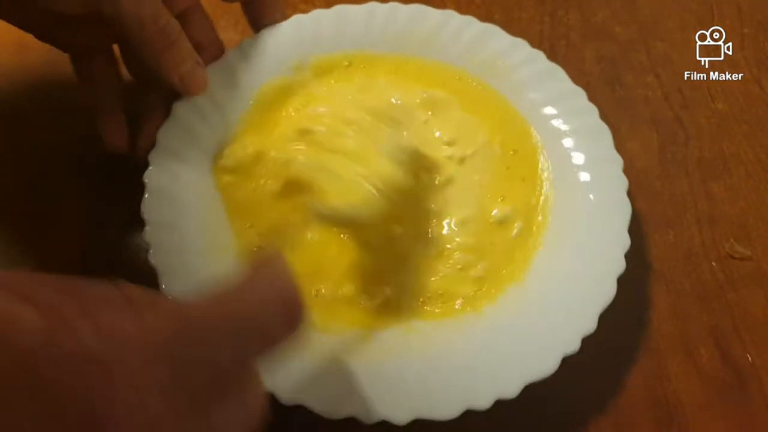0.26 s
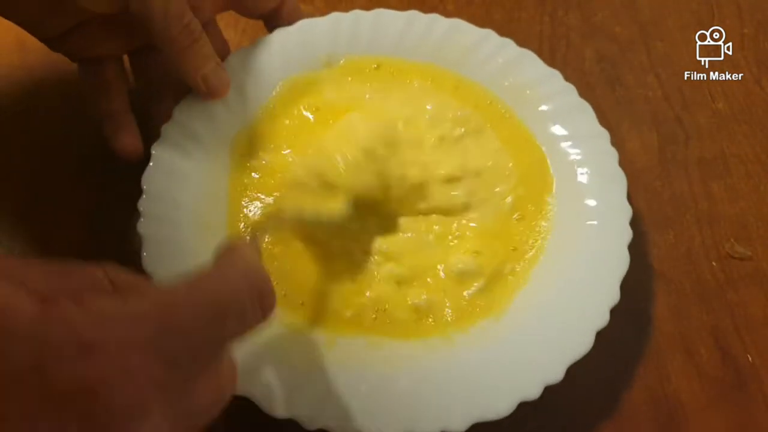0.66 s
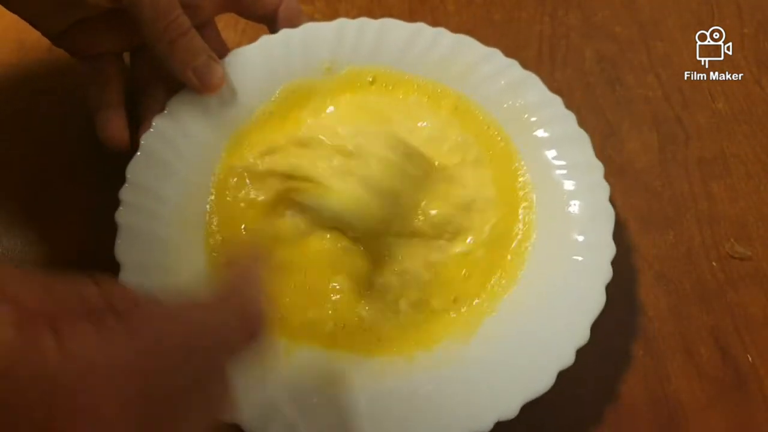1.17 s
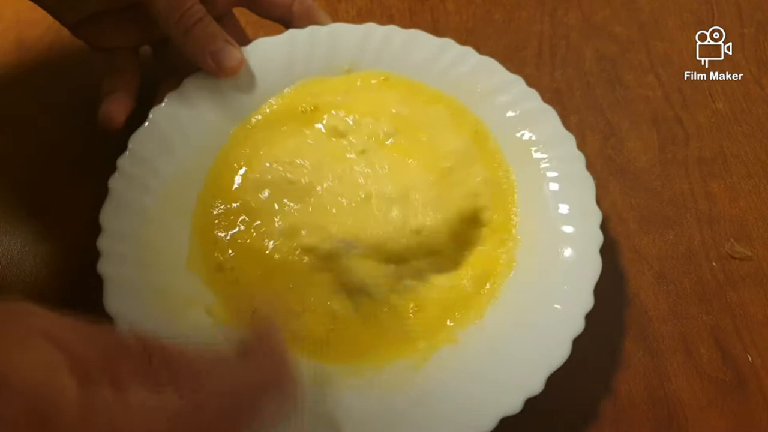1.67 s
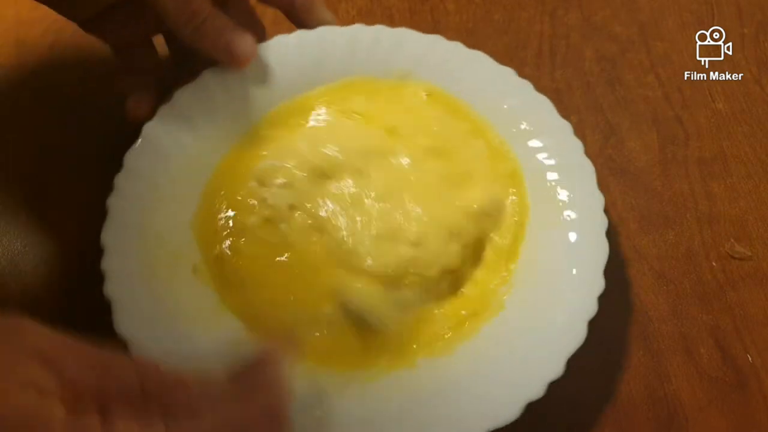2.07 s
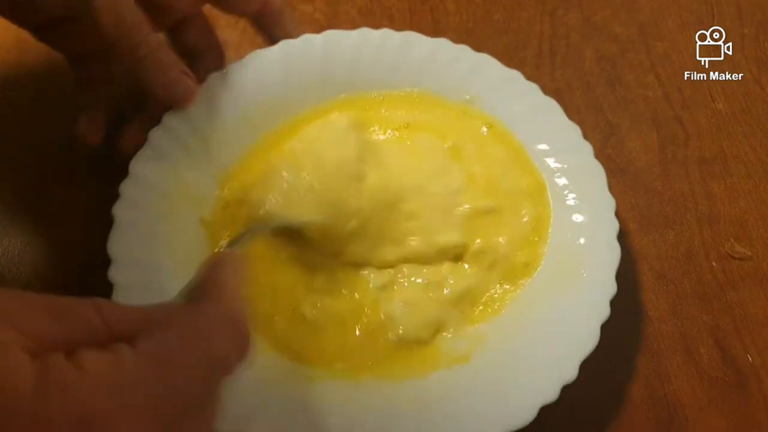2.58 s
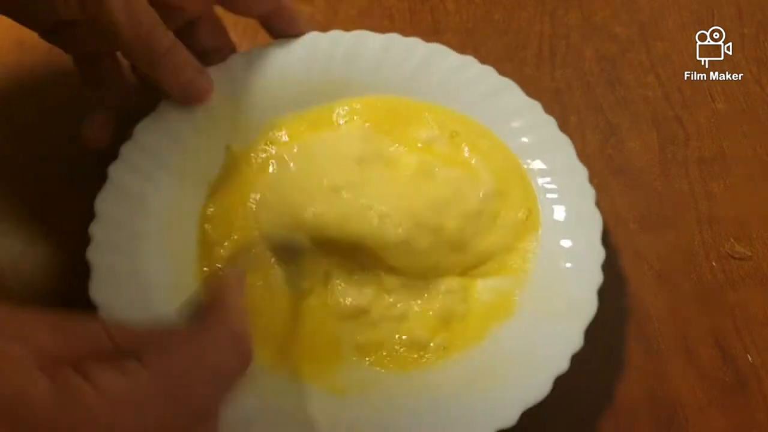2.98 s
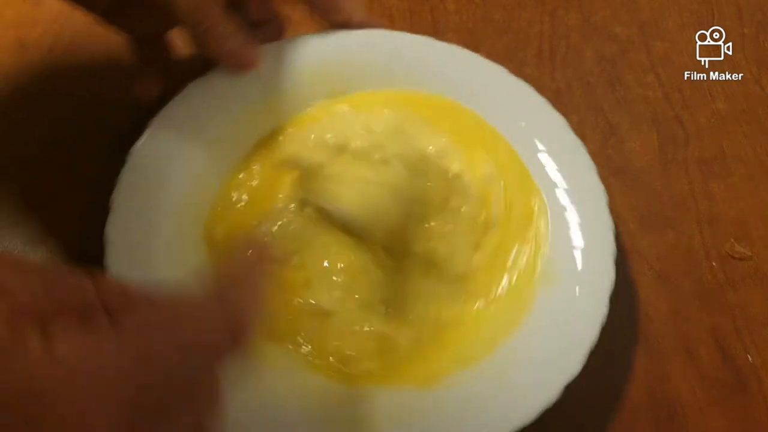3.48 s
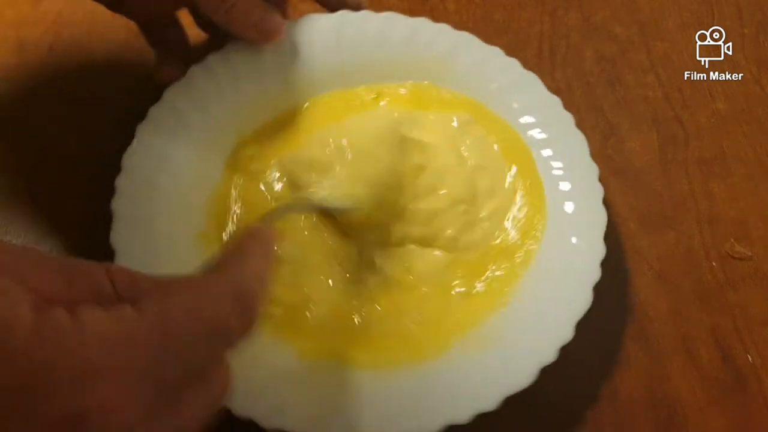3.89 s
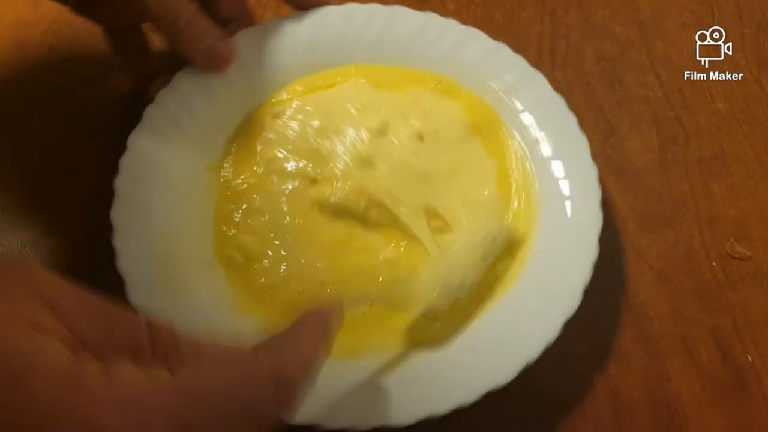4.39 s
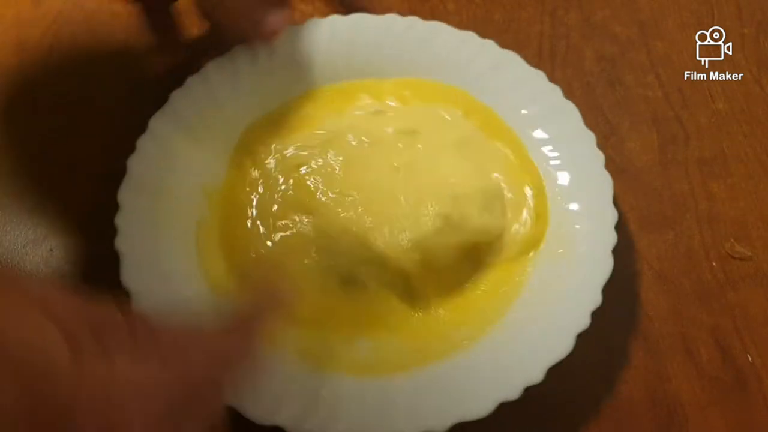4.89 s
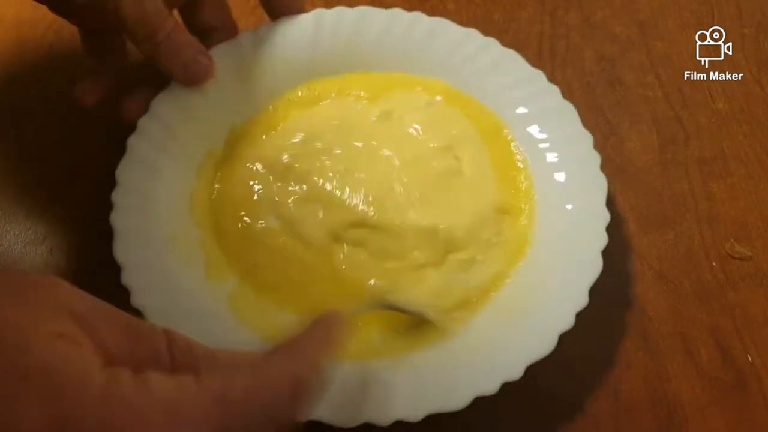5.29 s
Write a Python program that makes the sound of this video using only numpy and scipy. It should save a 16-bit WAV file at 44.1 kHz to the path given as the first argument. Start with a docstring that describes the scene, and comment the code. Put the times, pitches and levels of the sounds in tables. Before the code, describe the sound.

A fork beats eggs on a ceramic plate resting on a wooden table, heard close and slightly left of centre in a small kitchen. Two clacks with sharp wet slaps come in the first 0.3 seconds, followed by a round plop at about 0.4 seconds and a few softer wet sounds. From 1 second the clacks return and hold a quick, even rhythm, nearly five a second, until the end at about 5.7 seconds. Each stroke gives a short, damped ceramic ring and a hollow wooden thump. Between strokes, air pockets pop, froth crackles faintly and the egg sloshes, growing slightly wetter over time. The plate occasionally drags with a brief low rumble, such as near 1.1, 1.7, 3.1 and 4.2 seconds. The thumps get a little heavier from around 3.8 seconds. Faint room air and a low electrical hum continue underneath.

```python
"""Beating eggs with a fork

A ceramic plate on a wooden table in a small kitchen. On each stroke the tines slap into the egg,
ring the plate and thump the table. The egg sloshes, air pockets pop behind the fork, froth crackles
and deep scoops drag the plate. Faint room air and mains hum lie underneath."""
import sys
import numpy as np
from scipy import signal
from scipy.fft import rfft, irfft, next_fast_len
from scipy.io import wavfile
from scipy.ndimage import uniform_filter1d

SR = 44100
rng = np.random.default_rng(int(sys.argv[2]) if len(sys.argv) > 2 else 0)


def unload_wav(signal):
    """Save mono or channel-first audio to the path in sys.argv[1] as 16-bit WAV at rate SR, clipped to [-1, 1]."""
    wavfile.write(
        sys.argv[1],
        SR,
        np.round(np.clip(np.atleast_2d(signal).T, -1, 1) * 32767).astype(np.int16),
    )


N = 244314

# fork on plate: (time [s], clack [dB], body re clack [dB], force [dB], pitch of landing spot [Hz])
STRIKES = [(0.0675, -21.5, -5.5, -27.5, 3910), (0.2947, -25, -6.5, -27.5, 4630),
           (1.018, -24, -8.5, -24.5, 4640), (1.26, -20.5, -8, -26, 4080), (1.4832, -19, -2.5, -25, 4460),
           (1.7019, -18.5, -.5, -22, 4290), (1.9186, -19, .5, -21.5, 2270), (2.1276, -18, -2, -24, 2380),
           (2.338, -20.5, 0.5, -25.5, 2380), (2.5367, -19, -2, -23.5, 5200),
           (2.7303, -21.5, -1.5, -24.5, 3060), (2.9435, -19, -8, -28.5, 4100), (3.1575, -19, -2, -26, 4750),
           (3.3661, -21.5, -3.5, -27.5, 4600), (3.5902, -23.5, -1, -23.5, 4900),
           (3.8099, -22, -5, -20.5, 5250), (4.0432, -25, -1.5, -21.5, 6050),
           (4.255, -21, -5.5, -23.5, 4650), (4.4569, -19.5, -3, -22, 3450), (4.6646, -20, -6, -20.5, 3940),
           (4.8743, -19, -6, -19.5, 4300), (5.085, -20.5, -6, -21, 3300), (5.2966, -17.5, -5, -18, 3630),
           (5.5124, -22, -6, -21, 4560)]
# plate, damped by egg and hand: (frequency [Hz], width [Hz], level [dB])
PLATE_MODES = [(770, 770, -18), (1070, 38, -10), (1309, 127, -3), (1607, 83, 1), (2007, 403, -4),
               (2430, 630, 1), (2920, 676, 1), (3510, 109, -1.5), (3907, 232, -1.5), (4530, 453, -1.5),
               (4978, 140, 1.5), (6070, 680, -7.5), (7220, 1540, -18.5), (9610, 1500, -19.5),
               (12170, 270, -14.5), (13150, 4700, -27.5)]
# wooden table: (frequency [Hz], level [dB], t60 [s])
TABLE_MODES = [(58.6, -20, 0.35), (98.9, -21.5, 0.38), (137.2, -10.5, 0.19), (151.5, -5.5, 0.35),
               (185.05, -0.5, 0.42), (246, -21, 0.83), (270.4, -1, 0.36), (294.8, -4.5, 0.31),
               (340.5, 3.5, 0.11), (367.4, -0.5, 0.23), (379.8, -15, 0.2), (422.7, 7, 0.06),
               (452.6, -12.5, 0.22), (562, -4.5, 0.11), (711, -20.5, 0.35), (778, 1.5, 0.033)]
# louder wet slaps of tines in egg, mostly just before a blow, and at 0.8025 s a light tick of the fork on the
# plate: (time [s], peak [dB], centre [Hz], t60 [s])
LOUD_SLAPS = [(0.04, -24, 5000, .018), (0.0444, -15.5, 4900, 0.04), (0.2751, -18, 3400, 0.097),
              (.3963, -19.5, 3960, 0.024), (0.529, -28, 3840, 0.028), (0.8025, -22.5, 6300, .03),
              (0.981, -33, 3900, 0.036), (1.6756, -18.5, 3040, 0.024), (1.9065, -16, 4250, 0.0056),
              (2.5303, -15.5, 3200, .013), (3.5578, -23.5, 4140, 0.12), (4.03, -19, 4030, 0.053),
              (4.6495, -12.5, 2830, 0.023), (5.281, -15, 3000, .012)]
# air pockets: (time [s], level [dB], pitch [Hz], snap re note [dB])
POPS = [(.193, -30.5, 817, -13), (.351, -26.5, 865, -5), (.4088, -13, 477, 3.5), (.718, -21, 367, -13.5),
        (1.7811, -26, 456, -16), (1.835, -27, 760, 3), (2.0302, -34.5, 775, 9), (2.2639, -20, 1120, 8.5),
        (2.3257, -25.5, 1040, 8), (2.4654, -30.5, 755, 8), (2.4809, -25, 1370, 1), (2.8388, -29, 820, 0),
        (3.08, -28, 540, -2), (3.7194, -27, 564, -1), (3.9609, -25, 645, 4), (4.148, -29, 522, -14),
        (4.374, -28.5, 827, 13.5), (4.5988, -25.5, 1450, 7.5), (4.784, -31.5, 1370, 8.5),
        (5.246, -24, 880, 0), (5.4452, -35, 1240, 12.5)]
# deep scoops: (time [s], rumble [dB], half length [s], rumble pitch [Hz], slosh [dB])
SCOOPS = [(.42, -44, 0.058, 207, -47), (0.736, -32.5, 0.017, 252, -35), (0.972, -34, 0.03, 190, -49),
          (1.09, -29, 0.041, 179, -52), (1.653, -34, 0.061, 228, -46), (2.6, -50, 0.024, 292, -39.5),
          (3.09, -34, 0.049, 187, -51.5), (3.49, -44, 0.041, 188, -45), (4.162, -32, 0.028, 280, -43),
          (5.46, -41.5, 0.021, 290, -39)]
# room air spectrum: (frequency [Hz], relative level [dB])
AIR_SPECTRUM = [(10, -30), (28, -13), (50, 0), (100, -8), (250, -4.5), (600, -17.5), (2000, -20),
                (6000, -28.5), (16000, -47)]
# mains hum: (frequency [Hz], level [dB])
HUM_PARTIALS = [(50, -69), (100, -62)]
# kitchen reverberation: (frequency [Hz], t60 [s])
ROOM_DECAY = [(100, 0.49), (400, 0.42), (1500, 0.37), (4500, 0.35), (8000, 0.3), (15000, 0.28)]

THUMP_DB, TREBLE_DB = -1.5, -2  # re force: harder blows thump more and sound brighter
ENTRY_LEAD_S, ENTRY_SCATTER_S, ENTRY_HZ, ENTRY_T60_S = .014, .001, 3870, 0.031
ENTRY_DB, ENTRY_DB_PER_S = -35.5, 2  # louder as the egg froths
POP_T60_CYCLES = 24.7
SWEEP_LAG_S, SWEEP_HALF_S, SWEEP_SCATTER_S = .1, .04, .005
SLOSH_DB, SLOSH_DB_PER_S = -59, 3.5  # louder as the egg takes up air
BUBBLE_HZ, BUBBLE_HZ_PER_S = 546, 45  # bubbles grow finer
CRACKLE_RE_CLACK_DB, CRACKLE_LAG_S, CRACKLE_SCATTER_S = -17, .13, 0.063
TOP_HZ = 15800


def fork(room):
    """Each stroke clacks the plate and thumps the table; the moving hand changes the echoes."""
    out = np.zeros((2, N))
    for s, db, body_db, force_db, spot_hz in STRIKES:
        tail = (room + 1.5 * walls()) / np.hypot(1, 1.5)
        ring = clack(body_db, force_db + TREBLE_DB - db, spot_hz)
        add(out, s, amp(db) * in_room(ring, tail, wet_db=-6) * amp([[.4], [-.4]]))
        add(out, s, amp(force_db + THUMP_DB) * in_room(thump(), tail, wet_db=-5))
    return out


def contact():
    """The tines land in quick succession: a short broadband rattle."""
    t = clock(2048)
    fade = (amp(-60 * t / 0.026) + amp(-24.5 - 60 * t / 0.1)) * (1.05 - np.exp(-t / 0.00031)) ** 2
    rattle = stereo_noise(side_db=-0.5, size=2048) * fade
    for _ in range(4):  # flatten the spectrum: a sharp blow favours no pitch
        rattle = irfft(np.exp(1j * np.angle(rfft(rattle)))) * np.sqrt(fade)
    return rattle


def clack(body_db, treble_db, spot_hz):
    """The contact rings the plate, hardest near spot_hz; egg under the tines sets the band balance."""
    modes = [(hz, width_hz, db + rng.normal(0, 2.08) + 5 * np.exp(-((hz - spot_hz) / 400) ** 2))
             for hz, width_hz, db in PLATE_MODES]

    def response(f):
        plate = sum((-1) ** k * amp(db) * resonance(f, hz, width_hz)
                    for k, (hz, width_hz, db) in enumerate(modes))
        table_echo = 0.091 * np.exp(-2j * np.pi * f * 0.0019)
        return plate * (1 + table_echo)

    ring = filtered(contact(), response)
    bands = [signal.butter(3, hz, kind, fs=SR, output="sos")
             for hz, kind in [(3200, "low"), ([3200, 7000], "band"), (7000, "high")]]
    body, middle, treble = (burst(signal.sosfiltfilt(band, ring, padtype=None)) for band in bands)
    return amp(body_db) * body + middle + amp(treble_db) * treble


def thump():
    """A short knock, then the table's modes build up and ring."""
    t = clock(26000)
    ring = np.zeros_like(t)
    for k, (hz, db, t60_s) in enumerate(TABLE_MODES):
        fade = amp(db + rng.normal(0, 1.6) - 60 * t / t60_s)
        ring += fade * np.sin(2 * np.pi * hz * t + rng.normal(0, 1.0) + k * np.pi)
    knock = np.sin(2 * np.pi * 310 * t) * amp(8.5 - 60 * t / 0.027)
    return burst(ring * (1 - np.exp(-t / 0.021)) + knock * (1 - np.exp(-t / 0.00059)))


def slaps(room):
    """The tines break the surface in wet snaps: one slap before each blow, plus the louder ones."""
    out, t = np.zeros((2, N)), clock(4096)
    entries = [(s - ENTRY_LEAD_S + rng.normal(0, ENTRY_SCATTER_S),
                ENTRY_DB + ENTRY_DB_PER_S * s, ENTRY_HZ, ENTRY_T60_S) for s, *_ in STRIKES]
    for s, db, hz, t60_s in entries + LOUD_SLAPS:
        noise = stereo_noise(side_db=-6, size=4096)
        flicker = np.repeat(amp(rng.normal(0, 3, 128)), 32)
        snaps = noise * flicker * amp(-60 * t / t60_s)
        slap = filtered(snaps, lambda f: resonance(f, hz, 1.74 * hz) * resonance(f, hz, 9 * hz)
                        / (1 + (f / (2.06 * hz)) ** 4))
        add(out, s, amp(db) * in_room(slap / np.abs(slap).max(), room, wet_db=-6))
    return out


def pops(room):
    """An air pocket snaps open; its note falls as the cavity behind the fork grows."""
    out, t = np.zeros((2, N)), clock(8192)
    for s, db, hz, snap_db in POPS:
        glide_hz = hz * (1 + 1.76 * np.exp(-t / 0.00065) + 0.01 * np.exp(-t / 0.0052))
        note = np.sin(2 * np.pi * np.cumsum(glide_hz) / SR) * amp(-60 * t * hz / POP_T60_CYCLES)
        snap = filtered(contact(), lambda f: resonance(f, 2540, 2000) * resonance(f, 1600, 6800))
        pop = np.array([note, note])
        add(pop, 0, amp(snap_db) * snap / np.abs(snap).max())
        muffled = filtered(pop, lambda f: 1 / (1 + (f / 6000) ** 4))
        add(out, s, amp(db) * in_room(muffled, room, wet_db=-8.5))
    return out


def slosh(room):
    """Sweeps after each blow and in each scoop fold in air; the thick egg absorbs the treble."""
    out = np.zeros((2, N))
    sweeps = [(s + SWEEP_LAG_S + rng.normal(0, SWEEP_SCATTER_S),
               SLOSH_DB + SLOSH_DB_PER_S * s, SWEEP_HALF_S) for s, *_ in STRIKES]
    sweeps += [(s, slosh_db, half_s) for s, _, half_s, _, slosh_db in SCOOPS]
    for s, db, half_s in sweeps:
        hz = BUBBLE_HZ + BUBBLE_HZ_PER_S * s
        gurgle = bubbles(half_s, centre_hz=hz, log_spread=0.513, t60_cycles=11.7)
        froth = bubbles(half_s, centre_hz=3 * hz, log_spread=0.786, t60_cycles=8.5)
        muffled = filtered(gurgle + amp(-8) * froth, lambda f: 1 / (1 + (f / 3200) ** 2))
        add(out, s - .25, amp(db) * in_room(muffled, room, wet_db=1))
    return out


def bubbles(half_s, centre_hz, log_spread, t60_cycles):
    """A swell of short rising bubble notes, centred in 0.5 s."""
    count = int(2400 * half_s) + 1
    when, pitch, size = rng.standard_normal((count, 3)).T
    hz = np.clip(centre_hz * np.exp(log_spread * pitch), 200, 12000)[:, None]
    age = hz * clock(1024) / t60_cycles
    level_db = 6 * np.minimum(size, 2) - 1.5 * when ** 2
    notes = amp(level_db[:, None] - 60 * age) * np.sin(2 * np.pi * t60_cycles * age * (1 + 0.087 * age))
    starts = (np.clip(.25 + half_s * when, 0, .5) * SR).astype(int)
    indices = starts[:, None] + np.arange(1024)
    swell = np.bincount(indices.ravel(), notes.ravel(), SR // 2)[:SR // 2]
    return unit(swell) * np.sqrt(4 * half_s)


def crackle(room):
    """Sticky strands and tiny froth bubbles burst at random after each stroke."""
    out, t = np.zeros((2, N)), clock(512)
    for s, clack_db, *_ in STRIKES:
        for when, pitch, size, pan_db in rng.standard_normal((16, 4)):
            hz = np.clip(4200 * np.exp(.6 * pitch), 1000, 13000)
            tick = np.sin(2 * np.pi * hz * t) * amp(-60 * hz * t / 3.2)
            db = clack_db + CRACKLE_RE_CLACK_DB + 6 * np.clip(size, -2, 1.8)
            start_s = s + CRACKLE_LAG_S + CRACKLE_SCATTER_S * when
            add(out, start_s, amp([[db + pan_db], [db - pan_db]]) * tick)
    return in_room(out, room, wet_db=-10)[:, :N]


def drags():
    """Scoops drag the plate; the uneven push stirs the table's modes around one pitch."""
    out, t = np.zeros((2, N)), clock(SR // 2)
    for s, db, half_s, hz, _ in SCOOPS:
        push = rng.standard_normal(t.size) * np.exp(-.5 * ((t - .25) / half_s) ** 2)
        shake = signal.fftconvolve(push, thump())
        rumble = filtered(shake, lambda f: resonance(f, hz, 0.81 * hz) ** 2)
        peak_rms = np.sqrt(uniform_filter1d(rumble ** 2, size=2500).max())
        add(out, s - .25, amp(db) * rumble / peak_rms)
    return out


def background():
    """Still kitchen air and faint mains hum."""
    air = unit(filtered(stereo_noise(side_db=-4.5, size=N), lambda f: amp(along(AIR_SPECTRUM, f))))
    hum = sum(amp(db) * np.sqrt(2) * np.sin(2 * np.pi * hz * clock(N)) for hz, db in HUM_PARTIALS)
    return amp(-55) * air + hum


def walls():
    """Stereo room tail of energy 1; highs die sooner."""
    hz, t, spectra = signal.stft(rng.standard_normal((2, SR // 2)), SR, nperseg=256)
    shared = np.exp(-hz / 350)[:, None]  # long waves reach both channels alike
    spectra = (spectra + shared * spectra[::-1]) / np.hypot(1, shared)
    fade = amp(-60 * t / along(ROOM_DECAY, hz)[:, None])
    tail = signal.istft(spectra * fade, SR, nperseg=256)[1]
    tail *= 1 - np.exp(-(clock(tail.shape[1]) / 0.00022) ** 2)
    return tail / np.linalg.norm(tail[0])


def in_room(x, tail, wet_db):
    """Direct sound plus wall echoes."""
    out = amp(wet_db) * signal.fftconvolve(np.atleast_2d(x), tail, axes=1)
    add(out, 0, x)
    return out


def stereo_noise(side_db, size):
    """Mid/side white noise, rms 1."""
    mid, side = rng.standard_normal((2, size))
    return unit(np.array([mid + amp(side_db) * side, mid - amp(side_db) * side]))


def filtered(x, response):
    """Apply a complex frequency response."""
    n = x.shape[-1]
    padded = next_fast_len(n + 4096)
    return irfft(rfft(x, padded) * response(np.fft.rfftfreq(padded, 1 / SR)), padded)[..., :n]


def resonance(f, hz, width_hz):
    """Causal resonance, peak gain 1."""
    return 1j * f * width_hz / (hz * hz - f * f + 1j * f * width_hz)


def add(track, s, sound):
    """Mix in a sound from time s."""
    start = max(round(s * SR), 0)
    part = sound[..., :max(N - start, 0)]
    track[..., start:start + part.shape[-1]] += part


def amp(db):
    """Decibels to gain."""
    return 10 ** (np.asarray(db) / 20)


def unit(x):
    """Scale to rms 1."""
    return x / np.sqrt(np.mean(x ** 2) + 1e-20)


def burst(x):
    """Scale to the energy of 10 ms at rms 1."""
    return unit(x) * np.sqrt(SR / 100 / x.shape[-1])


def along(points, hz):
    """Interpolate over log frequency."""
    knots_hz, values = np.transpose(points)
    return np.interp(np.log(hz + 1), np.log(knots_hz + 1), values)


def clock(size):
    """Sample times [s]."""
    return np.arange(size) / SR


def scene():
    """Fork, plate and egg, slightly left of centre, in one small room."""
    room = walls()
    beating = fork(room) + slaps(room) + pops(room) + slosh(room) + crackle(room) + drags()
    return beating * amp([[.25], [-.25]]) + background()


def record(dry):
    """Bass cut, hard limit at full scale, steep low-pass."""
    thin = signal.sosfilt(signal.butter(2, 28, "high", fs=SR, output="sos"), dry)
    return filtered(np.clip(thin, -1, 1), lambda hz: 1 / np.sqrt(1 + (hz / TOP_HZ) ** 300))


dry = scene()
out = record(dry)
unload_wav(out)
```